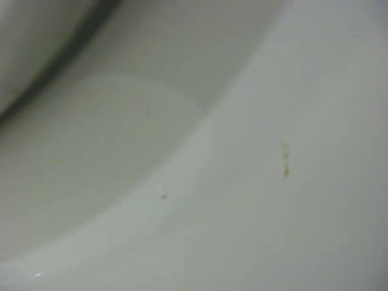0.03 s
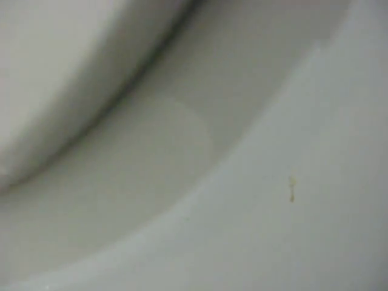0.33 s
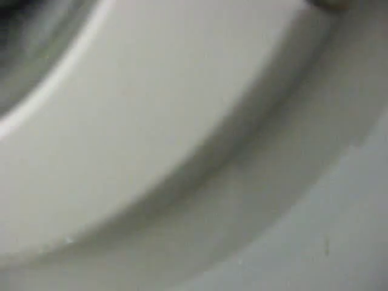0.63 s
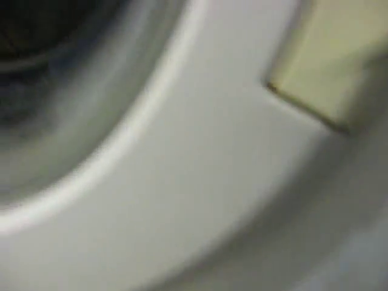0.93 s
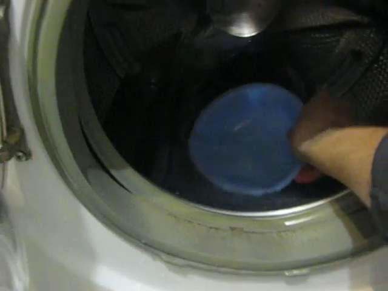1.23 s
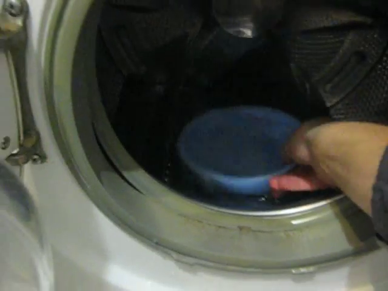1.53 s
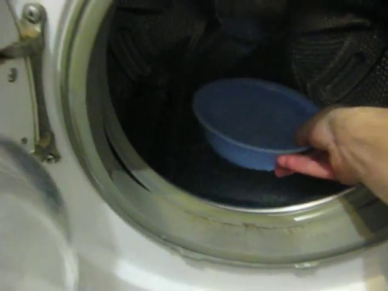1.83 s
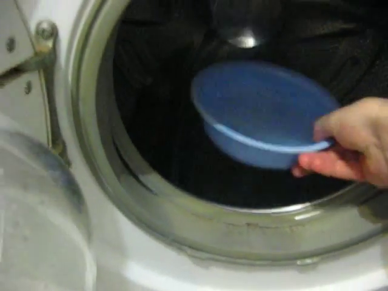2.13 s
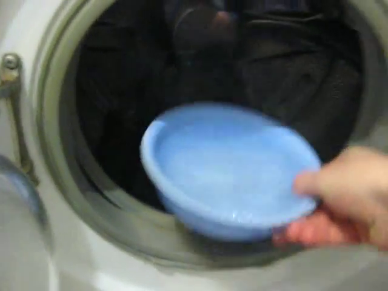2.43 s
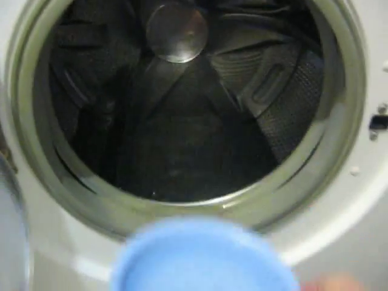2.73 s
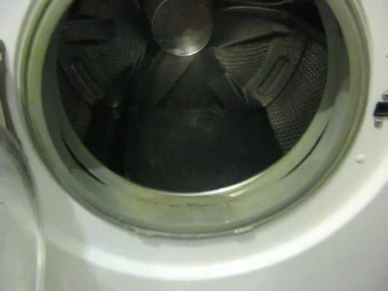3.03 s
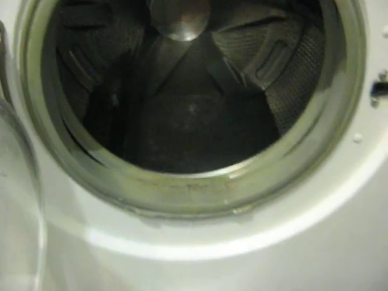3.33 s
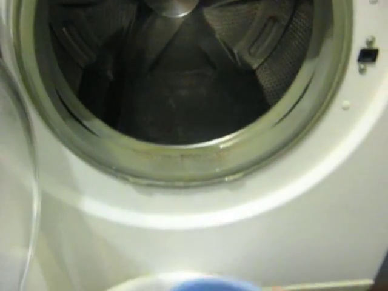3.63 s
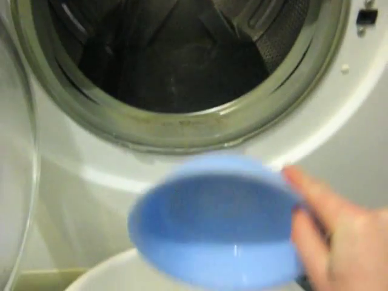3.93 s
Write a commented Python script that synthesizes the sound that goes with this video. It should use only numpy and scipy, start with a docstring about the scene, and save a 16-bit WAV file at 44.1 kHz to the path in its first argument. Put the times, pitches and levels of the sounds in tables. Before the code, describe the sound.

Close up in a small room, a washing machine churns and slaps wet laundry before stopping abruptly. A plastic bowl then knocks against the steel drum, water drips, and after a dull bump comes a gurgling, splashing pour.

```python
"""Washing drum and water bowl

Wet washing tumbles and slaps in a steel drum, exciting its resonances; the sound cuts off and resumes
with the door open, over hum and hiss. A plastic bowl knocks on the drum and scoops water, dripping as
it is lifted: each drop traps air that rings as a bubble. The bowl bumps the door seal and clicks on
something hard, a few drops fall, and the water is poured out in a gurgling splash of spray and bubbles."""
import sys
import numpy as np
from scipy import signal
from scipy.fft import rfft, irfft, next_fast_len
from scipy.io import wavfile
from scipy.ndimage import uniform_filter1d, map_coordinates

SR = 44100
rng = np.random.default_rng(int(sys.argv[2]) if len(sys.argv) > 2 else 0)


def pcm_store(signal):
    """Save signal as 16-bit PCM."""
    levels = np.round(np.clip(np.atleast_2d(signal), -1, 1) * 32767)
    wavfile.write(sys.argv[1], SR, levels.astype(np.int16).T)


N = 176400

# Falls of the load. Each row: peak time, rise and t60 in seconds, thud level and splash level in dB.
LOAD_FALLS = [(.003, 0.03, 0.049, -6.5, -27), (0.047, 0.055, 0.45, -22, -29.5),
              (0.153, 0.0069, 0.11, -23.5, -37), (0.235, 0.0033, .12, -20.5, -26),
              (0.355, 0.031, 0.29, -14.5, -25.5), (0.373, 0.019, 0.091, -35, -21),
              (0.5, 0.004, 0.3, -17, -29), (0.513, 0.011, 0.11, -27, -20), (.447, 0.007, .12, -42, -32.5),
              (.662, 0.015, 0.16, -27.5, -29), (0.691, .008, 0.053, -21.5, -23.5),
              (0.727, 0.014, 0.39, -21, -26), (0.764, 0.011, 0.18, -14, -24),
              (0.843, 0.012, 0.11, -21.5, -21), (0.895, 0.0069, 0.17, -21, -32),
              (0.943, 0.0047, .06, -40, -33.5), (0.969, 0.0021, 0.43, -32, -36.5),
              (1.095, .008, .2, -21, -20)]
# Booms of the tub. Each row: peak time, rise and t60 in seconds, level in dB.
TUB_BOOMS = [(.11, 0.083, 0.78, -26.5), (0.283, 0.019, 0.77, -18.5), (0.758, 0.044, 0.42, -24.5),
             (.88, 0.083, 0.17, -29), (1.1, 0.032, 0.5, -25)]
# Modes of the tub, the loaded drum and its treble. Each row: frequency and bandwidth in Hz, gain in dB.
TUB_MODES = [(80.3, 8.2, -12), (129.7, 18, -6), (149.4, 10.2, -2.5), (195.9, 6.2, -12.5)]
DRUM_MODES = [(273, 31, -4.5), (373.4, 40, 1), (431.7, 24.6, 2), (486.5, 25, 0), (531.7, 14, 0),
              (596, 13, 2), (638, 30, -4.5), (714.6, 16.4, 3), (828, 15, -6.5), (859.4, 13, -15),
              (1042, 26, -6.5), (1176, 10, -0.5), (1356.5, 17, 0), (2014, 32, -19.5)]
UPPER_DRUM_MODES = [(1800, 21, -15), (1983, 32, 9), (2540, 200, -6.5), (3500, 74, 5.5)]
# Spectra of the churning load and sloshing water. Each row: frequency in Hz, relative level in dB.
CHURN_SPECTRUM = [(60, -3), (200, 0), (450, -6.5), (850, 11), (1050, -11), (1700, -9), (2600, -20),
                  (5000, -72)]
SLOSH_SPECTRUM = [(400, -31), (1200, 2.5), (2000, -4), (3050, -7.5), (3550, 2), (4200, -8.5), (5000, -17),
                  (6000, -25.5), (7000, -49)]

def tumbling(churn_db=-27, slosh_db=-59, tub_db=-35, patter_per_s=170):
    """Forced vibration: falling washing drives the modes of drum and tub; thrown water patters on steel."""
    thud = power_sum(churn_db, [(s, rise, t60, db) for s, rise, t60, db, _ in LOAD_FALLS])
    splash = power_sum(slosh_db, [(s, rise, t60, db) for s, rise, t60, _, db in LOAD_FALLS])
    boom = power_sum(tub_db, TUB_BOOMS)
    drum = unit(noise(CHURN_SPECTRUM) + amp(-0.5) * ringing_noise(DRUM_MODES))
    impacts = (rng.random(N) < patter_per_s / SR) * rng.uniform(-0.94, 1, N)
    patter = unit(room(filtered(impacts, lambda hz: amp(along(SLOSH_SPECTRUM, hz))), wet_db=-1))
    steel = unit(resonate(impacts, UPPER_DRUM_MODES))
    water = unit(noise(SLOSH_SPECTRUM) + amp(-2) * patter + amp(-1) * steel)
    return thud * drum + splash * water + boom * ringing_noise(TUB_MODES)

# Bowl on the drum or its rubber seal. Each row: time in seconds, level in dB, share of ring time left.
BOWL_KNOCKS = [(1.4066, -17, 1), (2.76, -31, .2)]
# Modes of a knock. Each row: frequency in Hz, relative level in dB, free-ringing t60 in seconds.
STRUCK_MODES = [(224, -6, .5), (783, 6, .17), (835, 1, .17), (921, 2, .17), (2412, -11, .15),
                (129, -15, .3), (466, -10, .25), (698, -4, .17), (1168, -9, .2), (1604, -6, .16),
                (1803, -2, .12), (1960, -3, .14)]
# Contacts of a freely bouncing bowl. Each row: delay in seconds, relative level in dB.
BOUNCES = [(0, -2), (0.0105, -6), (0.0233, -14)]
# Spectrum of each contact. Each row: frequency in Hz, relative level in dB.
CONTACT_SPECTRUM = [(80, -0.5), (300, 9), (1800, -1.5), (2800, 3.5), (4200, -9), (6000, -22), (7000, -41)]

def bowl_knocks(rise_s=0.0005):
    """Impact excitation: the bowl strikes and rebounds; the wet drum rings unsteadily and shudders."""
    out, t = np.zeros(N), clock()
    for s, db, share in BOWL_KNOCKS:
        for hz, mode_db, t60 in STRUCK_MODES:
            phase = 2 * np.pi * (hz * t + rng.random()) + 0.5 * wobble(4 * np.sqrt(hz))
            out += amp(db + mode_db) * swell(s, rise_s, share * t60) * np.sin(phase)
        for delay, loss_db in BOUNCES:
            contact = swell(s + share * delay, rise_s, t60=share * 0.092)
            out += amp(db + loss_db + 2) * contact * noise(CONTACT_SPECTRUM)
        shudder = swell(s + 0.011, rise=0.016, t60=share * 0.3)
        out += amp(db - 8) * shudder * ringing_noise(DRUM_MODES)
    return room(out, wet_db=-16)

def bubble(hz, t60, attack_cycles=1.7, rise_per_t60=0.072):
    """Minnaert resonance: trapped air pulsates as a damped oscillator, here with a rising pitch."""
    t = np.arange(int(t60 * SR) + 2) / SR
    envelope = amp(-60 * t / t60) * (1 - np.exp(-t * hz / attack_cycles))
    return envelope * np.sin(2 * np.pi * hz * t * (1 + rise_per_t60 * t / t60 / 2))

def bubble_cloud(start, per_s, hz, log_spread, t60_cycles, scatter_db):
    """Superposition: random bubbles merge into a texture of about unit rms from start seconds onward."""
    out, span = np.zeros(N), N / SR - start
    for when, faintness, up, down in rng.random((4000, 4))[:int(per_s * span)]:
        pitch = min(hz * np.exp(log_spread * (up - down)), SR / 2)
        db = -scatter_db * np.log(faintness * 1.1 + 0.026)
        add(out, start + when * span, amp(db) * bubble(pitch, t60_cycles / pitch))
    return unit(out) * np.sqrt(span * SR / N)

# Strength of the poured stream. Each row: time in seconds, level in dB.
POUR_FLOW = [(3.12, -62.5), (3.168, -43), (3.19, -28.5), (3.29, -30), (3.351, -27.5), (3.387, -38),
             (3.455, -28.5), (3.499, -39), (3.552, -29.5), (3.615, -44), (3.7, -29), (3.722, -33),
             (3.799, -33.5), (3.85, -29.5), (3.9, -32.5), (3.956, -44), (3.985, -33)]
# Spectrum of the spray. Each row: frequency in Hz, relative level in dB.
SPRAY_SPECTRUM = [(130, -3), (400, 0.5), (1500, 10.5), (3300, 3.5), (4500, 6), (5800, -2.5), (7000, -17.5)]

def pour(spatter_db=3.8, fizz_top_hz=4660):
    """Air entrainment: the stream throws spray and drives air under, as fine fizz and larger gurgles."""
    start = POUR_FLOW[0][0]
    flow = amp(np.interp(clock(), *np.transpose(POUR_FLOW), left=-120))
    spray = unit(noise(SPRAY_SPECTRUM) * amp(spatter_db * wobble(300)))
    fizz = bubble_cloud(start, per_s=1500, hz=3035, log_spread=0.595, t60_cycles=44, scatter_db=6)
    fizz = filtered(fizz, lambda hz: 1 / np.sqrt(1 + (hz / fizz_top_hz) ** 10))  # tiny bubbles are faint
    gurgle = bubble_cloud(start, per_s=180, hz=1148, log_spread=0.723, t60_cycles=34, scatter_db=4.5)
    return room(flow * (amp(-3) * spray + amp(-1.5) * fizz + amp(-9) * gurgle), wet_db=-5.5)

# Drops and large bubbles. Each row: start in seconds, initial pitch in Hz, relative level in dB.
DROP_BUBBLES = [(1.650, 3140, -39), (1.676, 3050, -33), (1.693, 1520, -28.5), (1.733, 1575, -37),
                (1.738, 3650, -32), (1.785, 2993, -31.5), (1.787, 4060, -34), (1.826, 5425, -30),
                (1.84, 2290, -25.5), (1.861, 2490, -31.5), (2.032, 776, -24.5), (2.043, 656, -19.5),
                (2.068, 683, -34.5), (2.919, 838, -22.5), (2.961, 1856, -26), (2.978, 1396, -30.5),
                (3.017, 1500, -35.5), (3.196, 3190, -16), (3.217, 2740, -20.5), (3.234, 4230, -17),
                (3.255, 2930, -21), (3.285, 3734, -14.5), (3.287, 767, -21), (3.305, 1103, -19.5),
                (3.35, 3270, -18), (3.357, 3045, -16), (3.389, 1056, -14), (3.452, 3540, -19.5),
                (3.462, 720, -21.5), (3.544, 2270, -16.5), (3.584, 1247, -19.5), (3.594, 3390, -22.5),
                (3.632, 2805, -21), (3.657, 2520, -18), (3.696, 1684, -23.5), (3.749, 3026, -14.5),
                (3.779, 4730, -20.5), (3.756, 808, -25), (3.812, 2000, -16), (3.826, 3510, -15.5),
                (3.836, 2990, -14.5)]
# Slaps of water on water. Each row: time in seconds, level in dB.
WATER_SPLATS = [(1.652, -43.5), (1.788, -37), (1.826, -32.5), (2.031, -28), (2.918, -34.5), (2.961, -32),
                (2.983, -34), (3.017, -37.5), (3.072, -42.5), (3.196, -22), (3.284, -20.5), (3.593, -25),
                (3.694, -17), (3.849, -18.5)]
# Spectrum of a slap. Each row: frequency in Hz, relative level in dB.
SPLAT_SPECTRUM = [(200, -35.5), (800, -8), (2500, -3.5), (4500, 1), (6000, -12.5), (7000, -20.5)]
# Echo as the bowl leaves the drum. Each row: time in seconds, reverberant gain in dB.
ECHO_FADE = [(1.85, 3.5), (2.05, -6), (2.9, -14.5)]
# Resonance of the air in the drum. Each row: frequency and bandwidth in Hz, gain in dB.
CAVITY_MODES = [(680, 4.5, 5.7)]

def drops(t60_at_1khz=0.051, shed_delay_s=0.012, shed_log_spread=0.2):
    """Bubble resonance: each drop rings one bubble and sheds five lesser ones; heavy drops also splat."""
    def ring(hz):  # higher bubbles die sooner
        return bubble(hz, t60_at_1khz * (1000 / hz) ** 0.69)

    bubbles = np.zeros(N)
    for s, hz, db in DROP_BUBBLES:
        add(bubbles, s, amp(db + 4.5) * ring(hz))
        for shift, late in rng.standard_normal(size=(5, 2)):
            lesser = amp(db - 11.5) * ring(hz * np.exp(shed_log_spread * shift))
            add(bubbles, s + shed_delay_s * abs(late), lesser)
    splats = sum(amp(db) * swell(s, rise=0.0005, t60=0.05) for s, db in WATER_SPLATS)
    echo_db = np.interp(clock(), *np.transpose(ECHO_FADE))
    return room(bubbles + splats * noise(SPLAT_SPECTRUM), echo_db) + resonate(bubbles, CAVITY_MODES)

# Bumps of the bowl. Each row: time, rise and t60 in seconds, noise level and low push level in dB.
BOWL_BUMPS = [(2.342, 0.016, 0.38, -29.5, -17), (2.764, 0.05, .07, -38, -42.5)]
# Spectrum of a bump. Each row: frequency in Hz, relative level in dB.
BUMP_SPECTRUM = [(30, -23), (110, -7.5), (330, 5), (700, -12.5), (1500, -15.5), (2300, -26), (4000, -40)]

def bowl_bumps(push_hz=96, push_t60=0.12, push_attack_s=0.0074):
    """Compliant contact: a soft, slow blow excites mainly low frequencies, a dull noise and a low push."""
    out, t = np.zeros(N), np.arange(SR // 3) / SR
    envelope = amp(-60 * t / push_t60) * (1 - np.exp(-(t / push_attack_s) ** 2))
    push = envelope * np.sin(2 * np.pi * push_hz * t)
    for s, rise, t60, db, push_db in BOWL_BUMPS:
        out += amp(db) * swell(s, rise, t60) * noise(BUMP_SPECTRUM)
        add(out, s, amp(push_db) * push / np.abs(push).max())
    return out

# Clicks of the bowl's rim. Each row: time in seconds, level in dB, t60 in seconds.
RIM_CLICKS = [(2.7749, -24, 0.0073), (2.779, -28.5, 0.086), (2.7921, -15.5, 0.012), (2.807, -25, 0.0092),
              (2.8164, -27, 0.025), (2.837, -37, 0.029), (2.889, -43, 0.11)]
# Spectrum of a click. Each row: frequency in Hz, relative level in dB.
CLICK_SPECTRUM = [(200, -13), (1200, -16), (3000, 3), (4000, 12), (4700, 12), (5600, 3.5), (7000, -11)]

def rim_clicks():
    """Hard contact: a brief blow on the rim spreads its energy far into the treble."""
    envelope = sum(amp(db) * swell(s, rise=0.0011, t60=t60) for s, db, t60 in RIM_CLICKS)
    return envelope * noise(CLICK_SPECTRUM)

# Faint high tones. Each row: frequency in Hz, rms level in dB.
WHINE_TONES = [(1640, -73.5), (1748, -58), (1970, -66.5)]
# Spectrum of the hiss. Each row: frequency in Hz, relative level in dB.
HISS_SPECTRUM = [(41, -30), (70, -7), (239, -10), (533, -10), (646, -15), (1260, -16), (1620, -9.5),
                 (2330, -15), (4070, -15), (5120, -21.5), (6820, -38.5)]
# Course of the hiss. Each row: time in seconds, rms level in dB.
HISS_CONTOUR = [(1.16, -43.5), (1.4, -43.5), (1.9, -42.5), (2.7, -40), (2.79, -41.5), (2.83, -50),
                (3.15, -45), (4, -47.5)]

def background(hum_hz=49, hum_weakens_s=2.8):
    """Tones over a noise floor: a hum with its octave, a randomly modulated whine and broadband hiss."""
    t = clock()
    hum_level = amp(np.where(t < hum_weakens_s, -44.5, -51))
    phase = 2 * np.pi * hum_hz * t
    hum = hum_level * (np.sin(phase) + amp(-11.5) * np.sin(2 * phase))
    whine = sum(amp(db + 1.6 * wobble(5.6)) * np.sin(2 * np.pi * hz * t + 4.3 * wobble(25))
                for hz, db in WHINE_TONES)
    hiss = amp(np.interp(t, *np.transpose(HISS_CONTOUR))) * noise(HISS_SPECTRUM)
    return np.sqrt(2) * (hum + whine) + hiss

# Reverberation of the drum and tiled room. Each row: frequency in Hz, t60 in seconds.
ROOM_DECAY = [(150, 1), (800, 0.48), (2500, 0.25), (7000, 0.09)]

def room(x, wet_db):
    """Reverberation: diffuse reflections follow the direct sound and decay fastest in the treble."""
    hz, t, spectra = signal.stft(rng.standard_normal(SR // 2), SR, nperseg=256)
    tail = signal.istft(spectra * amp(-60 * t / along(ROOM_DECAY, hz)[:, None]), SR, nperseg=256)[1]
    response = np.pad(tail, (130, 0)) / np.linalg.norm(tail)
    return x + amp(wet_db) * signal.fftconvolve(x, response)[:N]

def amp(db):
    """Amplitude ratio of a level in dB."""
    return 10 ** (np.asarray(db) / 20)

def unit(x):
    """Normalisation to unit rms."""
    return x / np.sqrt(np.mean(x ** 2) + 1e-20)

def clock():
    """Sample times in seconds."""
    return np.arange(N) / SR

def along(points, hz):
    """Interpolation of (Hz, value) points on a log frequency axis."""
    knots, values = np.transpose(points)
    return np.interp(np.log(hz + 1), np.log(knots + 1), values)

def wobble(rate):
    """Smooth random modulation with rate knots a second."""
    return map_coordinates(rng.standard_normal(2000), [clock() * rate], mode="wrap")

def filtered(x, response):
    """Linear filtering: the spectrum of x times a frequency response."""
    size = next_fast_len(N + SR // 2)
    return irfft(rfft(x, size) * response(np.fft.rfftfreq(size, 1 / SR)), size)[:N]

def noise(spectrum):
    """Coloured noise of unit rms."""
    return unit(filtered(rng.standard_normal(N), lambda hz: amp(along(spectrum, hz))))

def resonate(x, modes):
    """Modal superposition: x drives second-order resonators of alternating polarity."""
    return filtered(x, lambda f: sum(
        (-1) ** k * amp(db) * 1j * f * width / (hz * hz - f * f + 1j * f * width)
        for k, (hz, width, db) in enumerate(modes)))

def ringing_noise(modes):
    """Random excitation: modes driven by white noise, at unit rms."""
    return unit(resonate(rng.standard_normal(N), modes))

def swell(s, rise, t60):
    """Gaussian rise to a peak at s seconds, then exponential decay by 60 dB in t60 seconds."""
    t = clock() - s
    return np.exp(-(np.minimum(t, 0) / rise) ** 2) * amp(-60 * np.maximum(t, 0) / t60)

def power_sum(floor_db, events):
    """Incoherent addition: swells and a steady floor add in power to give one amplitude envelope."""
    power = sum((amp(db) * swell(s, rise, t60)) ** 2 for s, rise, t60, db in events)
    return np.sqrt(amp(floor_db) ** 2 + power)

def add(track, s, sound):
    """Mix a sound into the track at s seconds."""
    part = track[max(round(s * SR), 0):][:len(sound)]
    part += sound[:len(part)]

def scene(cut_s=1.131, resume_s=1.162):
    """Gated superposition: the running machine, a moment of silence, then the work with the bowl."""
    t = clock()
    running = uniform_filter1d((t < cut_s) * 1.0, size=60)
    heard = uniform_filter1d(((t < cut_s) | (t > resume_s)) * 1.0, size=60)
    mix = running * tumbling() + bowl_knocks() + drops() + bowl_bumps() + rim_clicks() + pour()
    return (heard * (mix + background()))[None]

def record(dry, threshold_db=-27, slope=0.17, release_db_per_s=83.5):
    """Compression and band limiting: gain ducks after loud sounds and recovers; deep bass and top are cut."""
    x, t = dry[0], clock()
    level_db = 10 * np.log10(np.abs(uniform_filter1d(x * x, size=300, origin=149)) + 1e-12)
    held_db = np.maximum.accumulate(level_db + release_db_per_s * t) - release_db_per_s * t
    ducked = x * amp(-slope * np.maximum(held_db - threshold_db, 0))

    def passband(hz):
        low_cut = 1 - np.exp(-(hz / 36) ** 4)
        high_cut = (hz < 7150) / np.sqrt(1 + (hz / 6300) ** 36)
        return low_cut * high_cut

    return filtered(ducked, passband)[None]

dry = scene()
out = record(dry)
pcm_store(out)
```